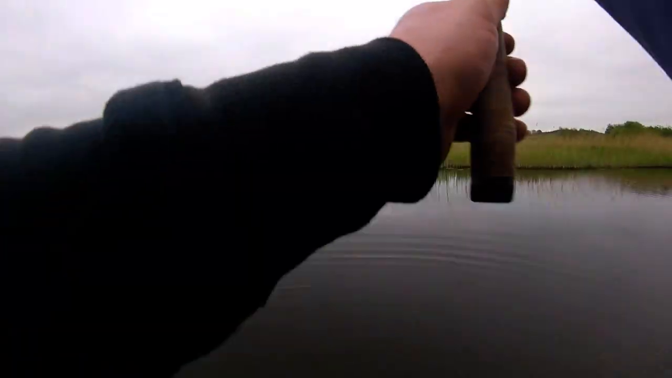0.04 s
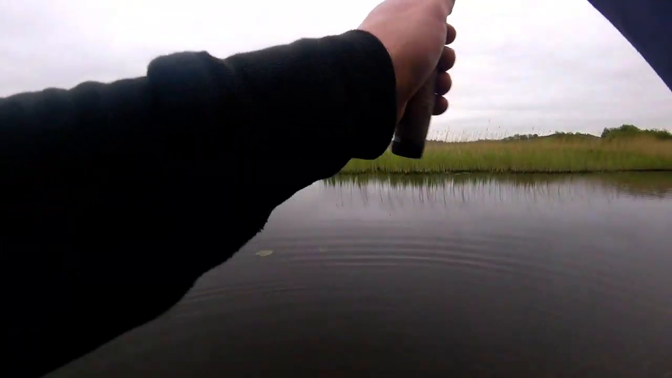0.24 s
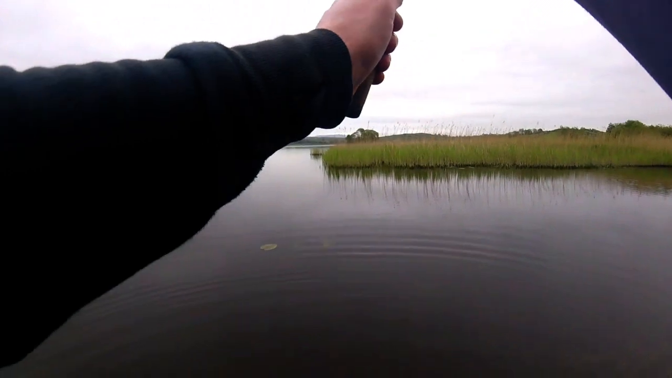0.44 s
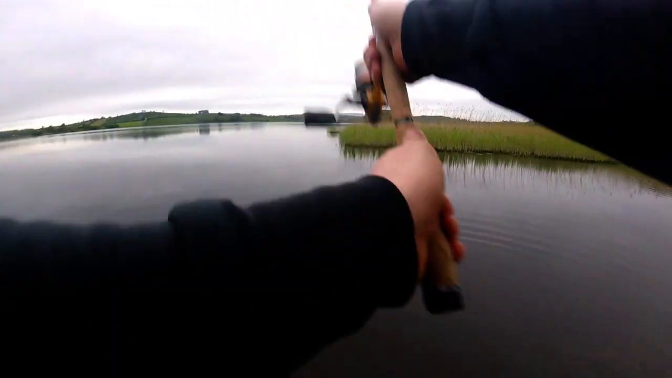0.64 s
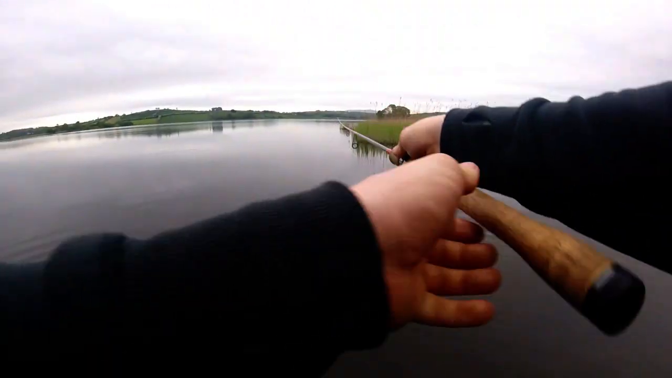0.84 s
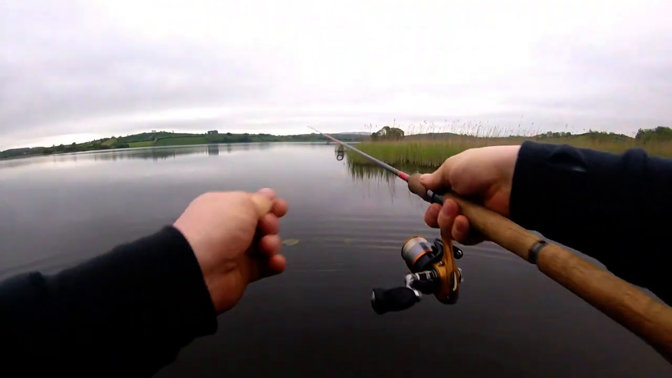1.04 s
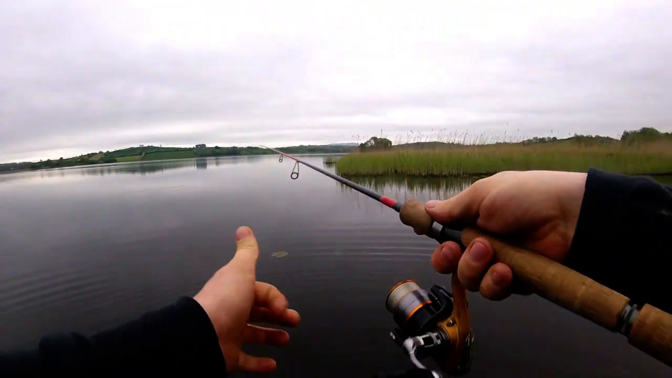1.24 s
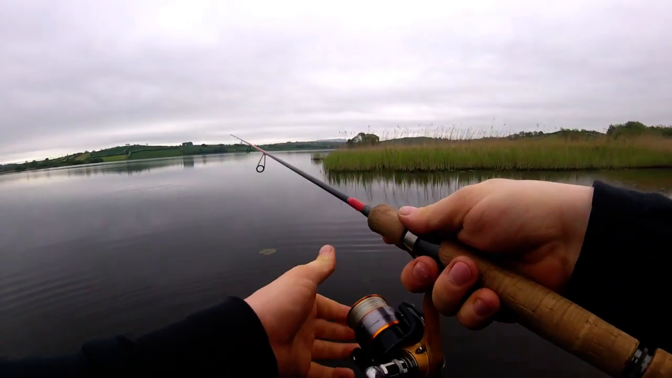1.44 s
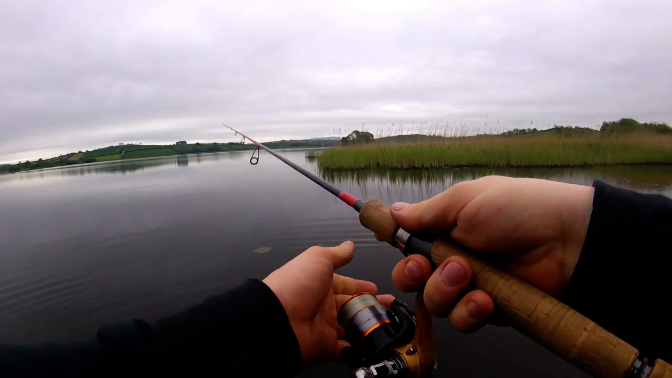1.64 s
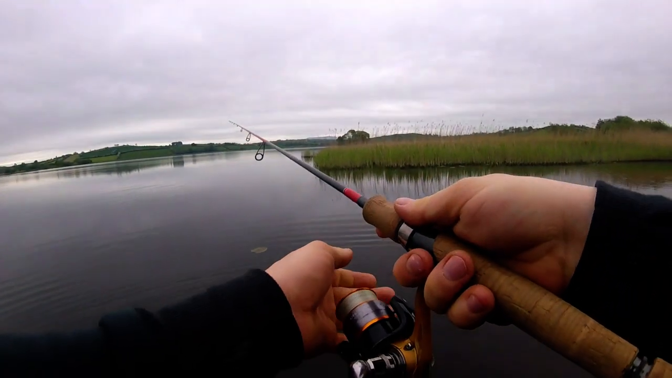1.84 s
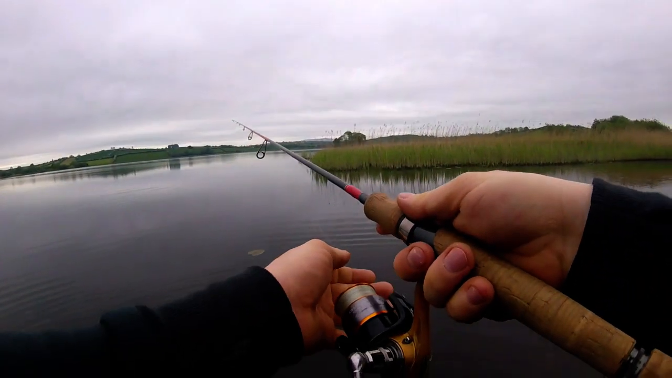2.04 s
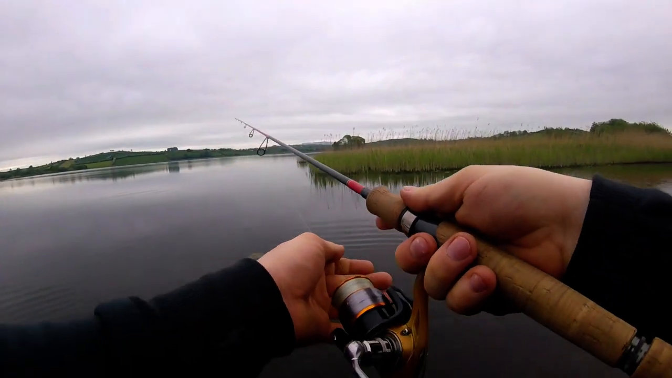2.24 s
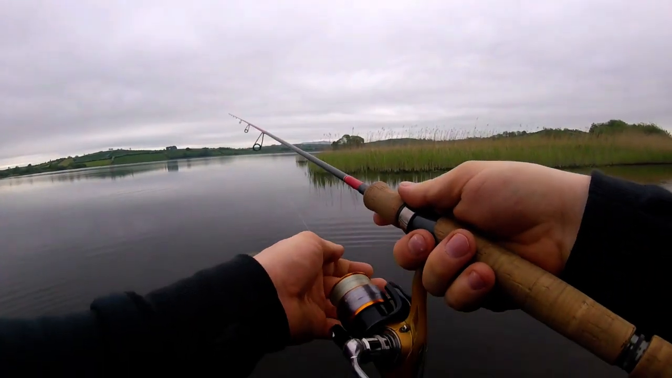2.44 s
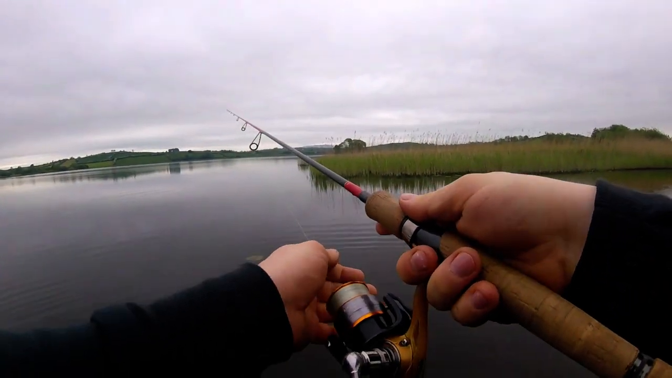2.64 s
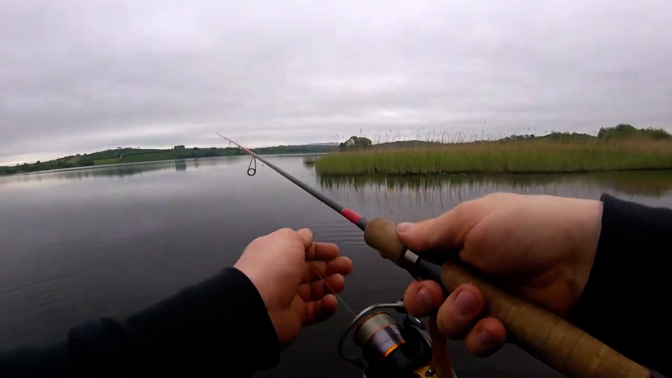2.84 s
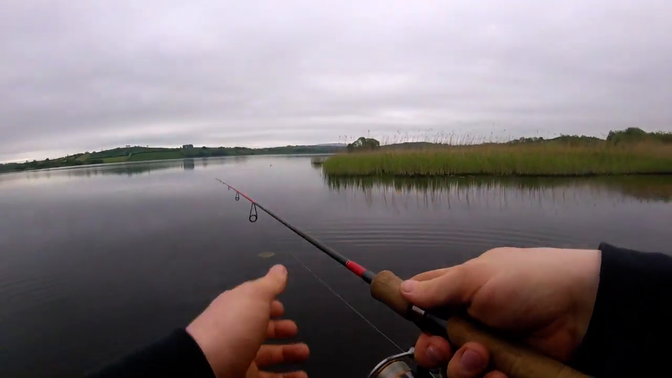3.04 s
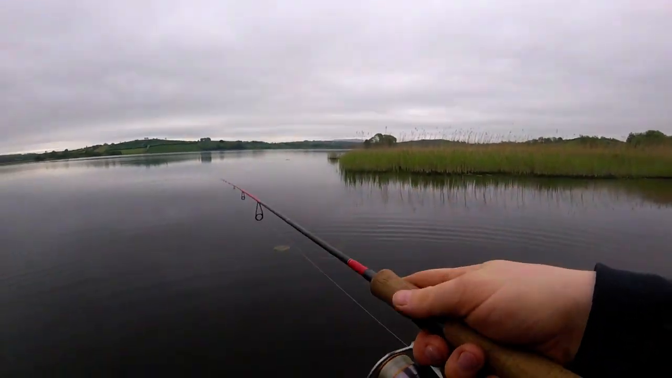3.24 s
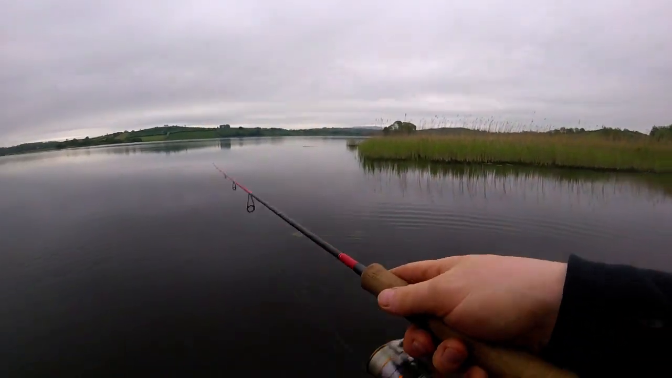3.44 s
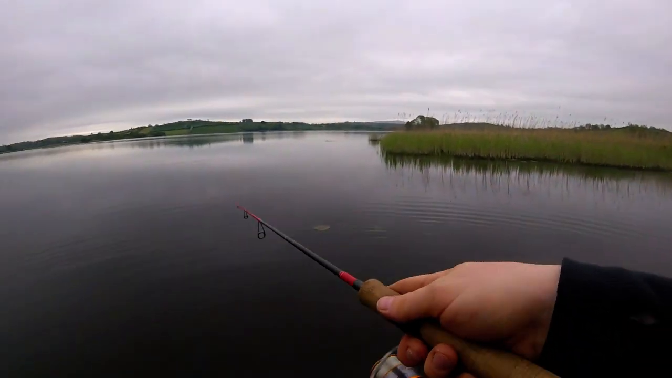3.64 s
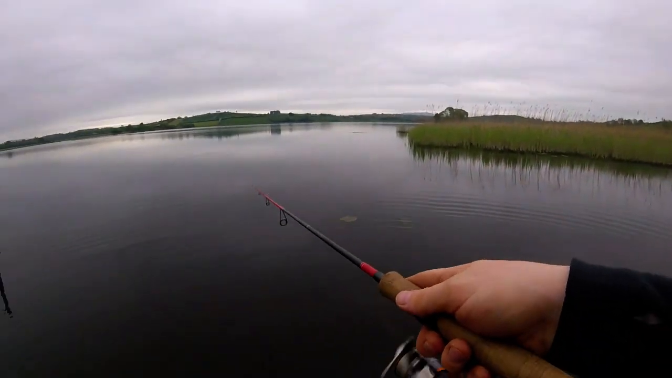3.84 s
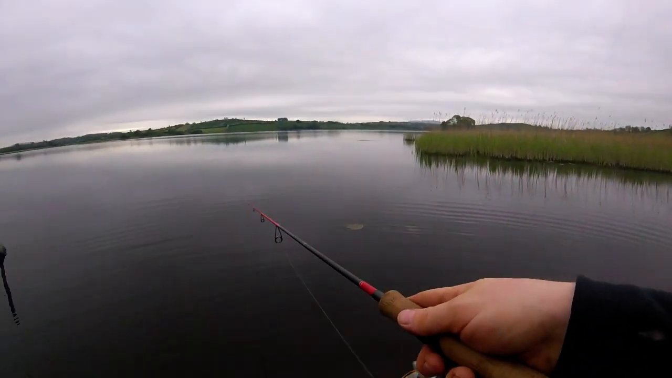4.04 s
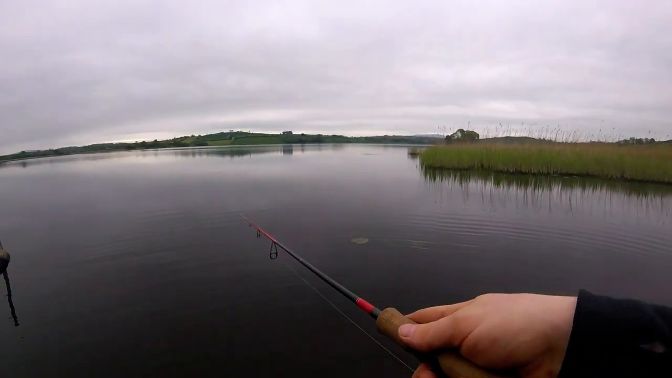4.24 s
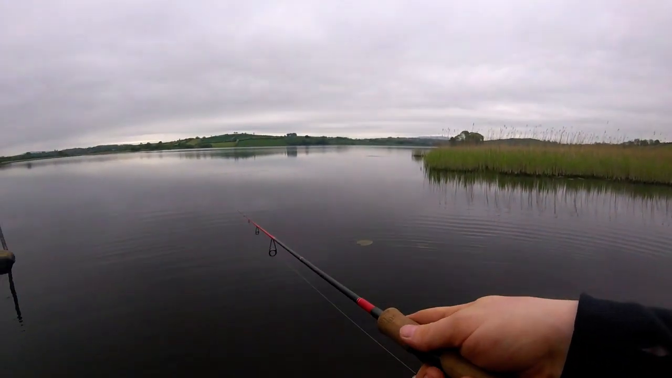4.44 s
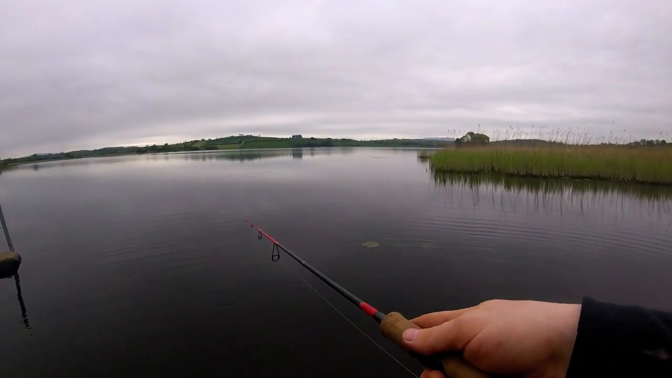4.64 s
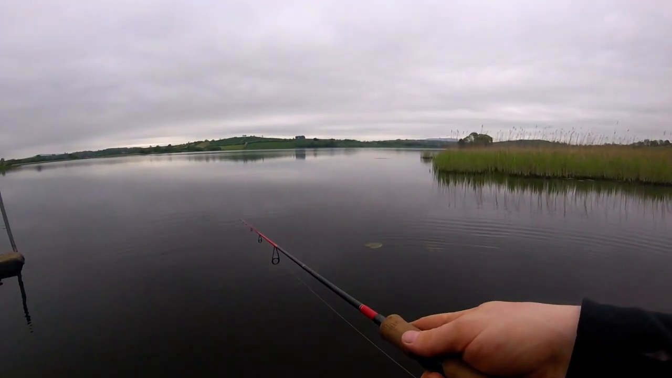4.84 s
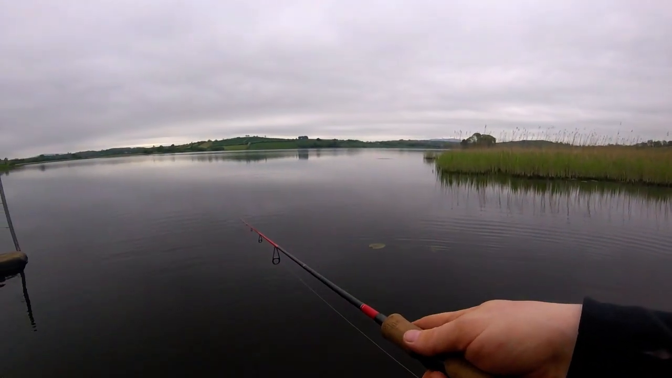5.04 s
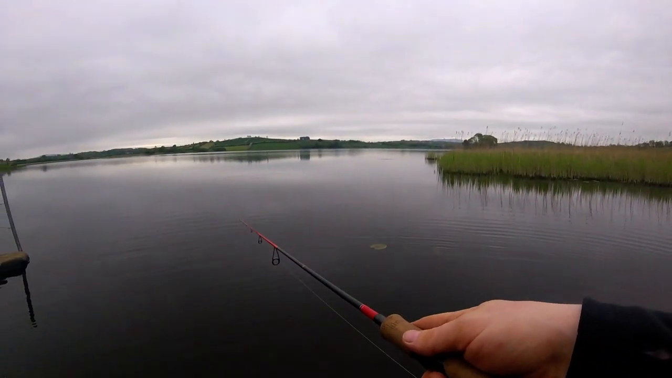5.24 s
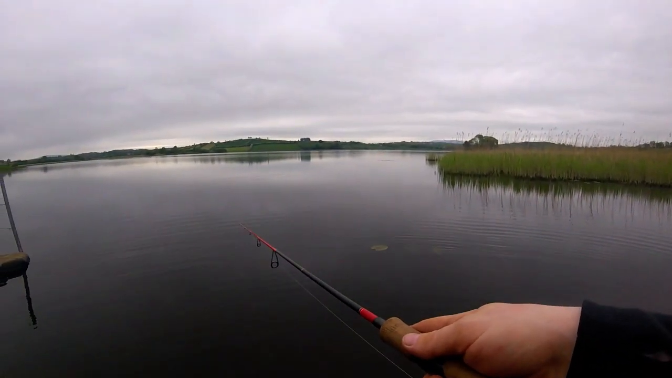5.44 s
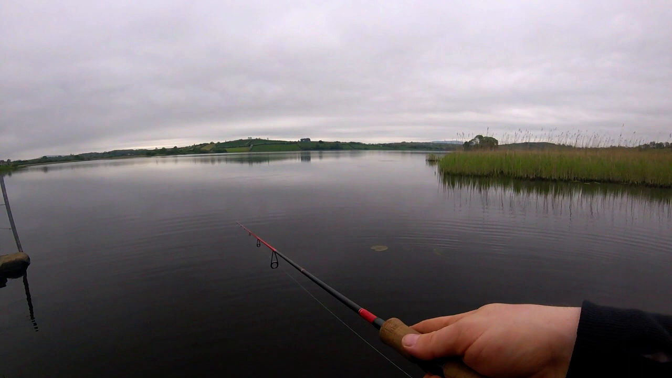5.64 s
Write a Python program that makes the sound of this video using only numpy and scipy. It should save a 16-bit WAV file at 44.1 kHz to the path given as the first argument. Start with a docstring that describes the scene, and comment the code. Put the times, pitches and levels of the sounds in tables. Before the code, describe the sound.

Gusts rumble on a close microphone by a lake, with faint whistles and chirps from two birds. A fishing cast begins with sleeve rustle, two hollow rod knocks and a quick swish. Line zips out, then coasts with a faint singing hiss and small ticks until the reel clacks shut, the loudest sound. Afterward come a brief rustle, soft knocks and more wind and birdsong.

```python
"""An angler casts a spinning rod over a calm lake, close to a chest-worn microphone.
Wind rumbles on the microphone, a far bird whistles and a reed bird chirps, on and off throughout.
Sleeves rustle through the wind-up, the rod knocks twice, and its tip sheds eddies in a swish.
Line zips off the spool, ticks through the rings and sings thinly as it coasts and slows.
Near 2.8 s the bail snaps shut and rings the reel; gusts, light knocks and birdsong follow."""
import sys
import numpy as np
from scipy import signal
from scipy.fft import rfft, irfft
from scipy.io import wavfile
from scipy.ndimage import uniform_filter1d

SR = 44100
rng = np.random.default_rng(int(sys.argv[2]) if len(sys.argv) > 2 else 0)


def to_wav(sig):
    """Store sig (one row per channel, or 1-D mono) as 16-bit WAV at the path in sys.argv[1].

    Samples outside -1..1 are clipped; the rate is SR.
    """
    pcm = np.clip(np.atleast_2d(sig), -1, 1) * 32767
    pcm = np.round(pcm).astype(np.int16)
    wavfile.write(sys.argv[1], SR, pcm.T)  # frames by channels


N = 251370
TIME = np.arange(N) / SR

# gusts on the microphone: (time [s], hold [s], level [dB])
GUSTS = [(0.125, 0.19, -44), (0.74, 0.042, -38.5), (0.984, 0.032, -36.5), (1.15, 0.28, -41),
         (1.461, 0.03, -35), (3.428, 0.011, -38), (3.668, 0.54, -41), (4.256, 0.45, -39), (5.656, .03, -43)]
# wind rumble, its faster buffeting, and open-air hiss: (frequency [Hz], relative level [dB])
RUMBLE_EQ = [(12, -12), (28, -0.5), (55, 0), (95, -7.5), (150, -20.5), (400, -61.5)]
BUFFET_EQ = [(50, -14), (130, 8.0), (210, 2.5), (500, -51.5)]
HISS_EQ = [(100, 5.5), (600, -4), (1200, -8), (2200, -10.5), (4200, -20), (5600, -18.5), (6550, -4.5),
           (7300, -12), (9000, -16.5), (11000, -28)]
# far bird: (time [s], length [s], start pitch [Hz], end pitch [Hz], level [dB], warble depth [Hz])
WHISTLES = [(0, 0.026, 2210, 1970, -62, 93), (0.274, 0.13, 3680, 3970, -73, 0),
            (.39, 0.15, 1820, 1850, -64.5, -7), (.595, 0.037, 2260, 2460, -61.5, 0),
            (0.63, 0.081, 1830, 2450, -57, 0), (0.813, .094, 2665, 2450, -53, 0),
            (4.4, 0.23, 2415, 2550, -70, -2), (4.687, 0.081, 1890, 1810, -67.5, -4),
            (4.849, .07, 1700, 1830, -71, 0), (4.936, 0.046, 2830, 2740, -61, 85),
            (4.958, .16, 2830, 2080, -57.5, 0), (5.097, .1, 2150, 2560, -64.5, 290),
            (5.297, 0.16, 2535, 2320, -63.5, 123), (5.337, 0.3, 2425, 2198, -59, 2)]
# reed bird's syllables: (length [s], start pitch [Hz], middle pitch [Hz], end pitch [Hz])
FALL = (.054, 6400, 4750, 3600)
RISE = (.042, 5050, 5550, 6150)
CLIMB = (.042, 3250, 4400, 5900)
DIP = (.05, 6700, 5850, 6450)
SCOOP = (.055, 5750, 5450, 5700)
DROP = (.032, 4750, 4550, 3300)
SLUR = (.065, 4750, 4350, 4350)
SLIDE = (.08, 5950, 4600, 3100)
FLICK = (.026, 5500, 4400, 4050)
# its phrases: (time [s], level [dB], syllable, repeats, period [s], swell per repeat [dB])
REED_PHRASES = [(.072, -71.5, FALL, 3, .157, 1), (.975, -65, SCOOP, 1, 0, 0),
                (1.462, -65.5, DIP, 3, .182, 1.5), (1.966, -68.5, SLUR, 1, 0, 0),
                (2.062, -70.5, FLICK, 13, .0578, 0), (2.968, -70.5, CLIMB, 1, 0, 0),
                (3.283, -64, SLIDE, 1, 0, 0), (4.239, -69.5, DROP, 1, 0, 0), (4.268, -69.5, CLIMB, 1, 0, 0),
                (4.451, -67, RISE, 3, 0.203, 1.5), (4.507, -73, FALL, 3, .204, 1.8)]
# wind-up, follow-through, letting go of the reel: (peak time [s], level [dB], rise [s], fall [s])
ARM_MOVES = [(.47, -48, 0.58, 0.42), (.8, -50, 0.12, 0.52), (3.17, -50.5, 0.17, 0.13)]
# sleeve rustle: (frequency [Hz], relative level [dB])
CLOTH_EQ = [(80, 1), (200, 6), (450, 3), (850, -2), (1400, -15), (2500, -22.5), (5000, -27), (10000, -36)]
# hollow knocks of rod and grip: (time [s], level [dB], pitch [Hz])
ROD_KNOCKS = [(0.6376, -25, 787), (.7203, -20, 617), (0.741, -34.5, 132), (3.656, -42, 172),
              (4.486, -35.5, 145), (5.484, -44, 344)]
# line and fingers on reel and rings: (time [s], level [dB], brightest frequency [Hz], t60 [s])
TICKS = [(.667, -46.5, 3200, .012), (.7573, -25.5, 5350, 0.0054), (0.818, -39, 5000, .008),
         (0.8702, -35.5, 5200, 0.0086), (1.2526, -41, 5430, 0.0069), (1.511, -42.5, 5660, .0084),
         (2.7121, -41, 4930, 0.023), (3.289, -52, 2350, 0.035), (3.325, -46, 5300, 0.065)]
# rush of the line: (frequency [Hz], relative level [dB])
LINE_EQ = [(400, -23), (1300, 3.5), (2000, -0.5), (2600, 4.5), (3400, 0), (4300, -5), (5600, 6), (7000, -8),
           (11000, -27)]
# the bail trips, strikes its stop, rebounds and settles:
# (time [s], level [dB], first bounce gap [s], loss per bounce [dB])
BAIL_HITS = [(2.7963, -29, 0.0057, 1), (2.811, -12.5, 0.0032, 0.2), (2.8224, -22.5, 0.006, 0.5),
             (2.8431, -36, 0.0055, 19), (2.864, -49.5, 0.01, -0.5)]
# crack of metal on metal: (frequency [Hz], relative level [dB])
CRACK_EQ = [(120, -33), (470, 1), (850, -12.5), (1600, -0.5), (2300, -1.5), (3000, -14), (3600, 0.5),
            (4400, -6.5), (6400, 8), (7800, -7.5), (11000, -14.5)]
# ring of bail wire and spool: (frequency [Hz], relative level [dB])
WIRE_MODES = [(4893, -16), (5115, -5.5), (5265, -11), (5510, -7), (5790, -42), (6075, -31), (6285, -28),
              (6423, -11), (6590, -3), (6895, -20), (7160, -15), (7350, -22)]
# ring of the reel's casing: (frequency [Hz], relative level [dB], t60 [s])
CASING_MODES = [(320, -37, 0.044), (460, -28, 0.35), (490.5, -20.5, 0.15), (1058, -18, 0.08),
                (1607, -14, 0.06), (2280, -15, 0.034)]

RELEASE_S, BAIL_TRIP_S = .739, BAIL_HITS[0][0]  # the line runs between these cues


def gain_of(db):
    """Decibels to amplitude."""
    return 10 ** (np.asarray(db) / 20)


def unit_rms(x):
    """Scales to rms 1."""
    return x / np.sqrt(np.mean(x ** 2) + 1e-20)


def envelope(s, hold_s, db, rise_s, fall_s):
    """Gain that swells until time s, holds, then dies away."""
    before, after = np.maximum(s - TIME, 0), np.maximum(TIME - s - hold_s, 0)
    return gain_of(db) * np.exp(-before / rise_s - after / fall_s)


def add(mix, s, sound):
    """Lays a sound into the mix at time s."""
    part = mix[max(round(s * SR), 0):][:len(sound)]
    part += sound[:len(part)]


def colour(x, eq, size=4096):
    """Minimum-phase EQ that passes white noise at equal power."""
    hz, db = np.transpose(eq)
    bins = abs(np.fft.fftfreq(size, 1 / SR))
    log_gain = np.log(gain_of(np.interp(np.log(bins + 1), np.log(hz), db)))
    taps = np.fft.ifft(np.exp(np.conj(signal.hilbert(log_gain)))).real[:size // 2]
    return signal.fftconvolve(x, taps / np.linalg.norm(taps))[:len(x)]


def drift(rate_hz):
    """Smooth random wander of rms 1."""
    hz = np.fft.rfftfreq(N, 1 / SR)
    return unit_rms(irfft(rfft(rng.standard_normal(N)) * np.exp(-(hz / rate_hz) ** 2), N))


def phase_of(hz):
    """Running phase of a gliding pitch."""
    return 2 * np.pi * np.cumsum(hz) / SR


def burst(t60):
    """Noise that starts near rms 1 and dies away."""
    decay = gain_of(-60 * np.arange(SR // 4) / SR / t60)
    noise = decay * rng.standard_normal(len(decay))
    return noise * np.linalg.norm(decay) / np.linalg.norm(noise)


def reverb(x, t60):
    """Diffuse reflections of about equal power."""
    tail = burst(t60)
    return signal.fftconvolve(x, tail / np.linalg.norm(tail))[:N]


def wind(breeze_db=-47, rise_s=0.035, fall_s=0.028, steadiness=0.43, buffet_db=-15, buffet_growth=1.85):
    """Low turbulence rumbles on the microphone; strong gusts add faster buffeting."""
    eddies = colour(rng.standard_normal(N), RUMBLE_EQ, size=16384)
    power = uniform_filter1d(eddies ** 2, size=4000) + 1e-9
    rumble = unit_rms(eddies / power ** (steadiness / 2))  # gentle compression
    gust = np.sqrt(gain_of(breeze_db) ** 2 + sum(envelope(*row, rise_s, fall_s) ** 2 for row in GUSTS))
    buffet = colour(rng.standard_normal(N), BUFFET_EQ)
    buffet *= gain_of(buffet_db) * gust.max() * (gust / gust.max()) ** buffet_growth
    return gust * rumble + buffet


def air(db=-57.5):
    """A steady bed of air and microphone hiss, with a narrow crest in the treble."""
    return gain_of(db) * colour(rng.standard_normal(N), HISS_EQ)


def bird_note(length, start_hz, middle_hz, end_hz, db, warble_depth_hz=0, warble_hz=85):
    """A near-pure tone bending through three pitches."""
    t = np.arange(int(length * SR)) / SR
    bend = np.polyfit([0, .5, 1], [start_hz, middle_hz, end_hz], 2)
    hz = np.polyval(bend, t / length) + warble_depth_hz * np.sin(2 * np.pi * warble_hz * t)
    swell = np.sqrt(np.sin(np.pi * t / length))
    return gain_of(db) * unit_rms(swell * np.sin(phase_of(hz)))


def far_bird(glide_by_middle=.66):
    """Whistles that glide quickly at first, then ease off; some warble."""
    song = np.zeros(N)
    for s, length, start_hz, end_hz, db, warble in WHISTLES:
        middle_hz = start_hz + glide_by_middle * (end_hz - start_hz)
        add(song, s, bird_note(length, start_hz, middle_hz, end_hz, db, warble))
    return song


def reed_bird(db_per_octave=20, scatter_db=-3, scatter_t60=0.025):
    """Repeated chirps, each tilted louder toward its higher end and blurred by the reeds."""
    song = np.zeros(N)
    for s, db, syllable, repeats, period, swell_db in REED_PHRASES:
        _, start_hz, _, end_hz = syllable
        for k in range(repeats):
            chirp = bird_note(*syllable, db + k * swell_db)
            octaves = np.log2(end_hz / start_hz) * np.linspace(-.5, .5, len(chirp))
            add(song, s + k * period, chirp * gain_of(db_per_octave * octaves))
    return song + gain_of(scatter_db) * reverb(song, scatter_t60)


def birds(waver_db=2.0, echo_db=-15, echo_t60=0.1):
    """Both birds waver with distance, and the shore returns a faint echo."""
    song = (far_bird() + reed_bird()) * gain_of(waver_db * drift(130))
    return song + gain_of(echo_db) * reverb(song, echo_t60)


def sleeves(fidget_db=-67, rough_db=1.45):
    """Soft cloth slides and catches, swelling with each arm move."""
    move_power = sum(envelope(s, 0, *shape) ** 2 for s, *shape in ARM_MOVES)
    motion = np.sqrt(gain_of(fidget_db) ** 2 + move_power)
    friction = rng.standard_normal(N) * gain_of(rough_db * drift(50))
    return motion * unit_rms(colour(friction, CLOTH_EQ))


def rod_knock(db, pitch_hz, ring_cycles=13, sag=0.13, sag_s=0.0052, rise_s=0.0004,
              overtone_ratio=1.69, overtone_db=-12):
    """Rod and grip ring hollow for a few damped cycles, with a sagging pitch and one overtone."""
    t = np.arange(SR // 8) / SR
    phase = phase_of(pitch_hz * (1 + sag * np.exp(-t / sag_s)))
    tone = np.sin(phase) + gain_of(overtone_db) * np.sin(overtone_ratio * phase)
    shape = (1 - np.exp(-(t / rise_s) ** 2)) * gain_of(-60 * t * pitch_hz / ring_cycles)
    return gain_of(db) * shape / shape.max() * tone


def tick(db, hz, t60, body_db=-5, scoop_db=-8, top_db=-13):
    """A light contact: a noise burst with a bright peak and some body far below it."""
    eq = [(hz / 12, -20), (hz / 3, body_db), (hz / 1.55, scoop_db),
          (hz, 0), (hz * 1.46, top_db), (hz * 2, -24)]
    return gain_of(db) * colour(burst(t60), eq)


def rod_swish(peak_s=.746, rise_s=0.017, fall_s=0.075, top_hz=1950, top_db=-42, growth=5, fuzz_hz=280):
    """Eddies shed by the rod make a fuzzy tone whose pitch and level follow the tip's speed."""
    speed = envelope(peak_s, 0, 0, rise_s, fall_s)
    eddies = unit_rms(np.sin(phase_of(top_hz * speed) + 2 * drift(fuzz_hz)))
    return gain_of(top_db) * speed ** growth * eddies


def spool_zip(start_hz=4000, end_hz=5700, climb_s=.05, db=-47, fuzz_hz=250):
    """The first coils zip off the spool with a fuzzy whistle that climbs as they speed up."""
    hz = end_hz + (start_hz - end_hz) * np.exp(-np.maximum(TIME - RELEASE_S, 0) / climb_s)
    tone = unit_rms(np.sin(phase_of(hz) + 2 * drift(fuzz_hz)))
    return envelope(RELEASE_S, 0, db, rise_s=0.0071, fall_s=0.016) * tone


def running_line(slaps_per_s=600, slap_share=0.8, rush_db=-45.5, sag_db_per_s=77,
                 coast_db=-65, slowing_db_per_s=2, sing_s=1.59, sing_hz=4770, sing_db=-68):
    """Coils slap the spool lip and hiss through the rings: a short rush, then a singing coast."""
    slaps = unit_rms(rng.choice([-1, 1], N) * (rng.random(N) < slaps_per_s / SR))
    hiss = rng.standard_normal(N)
    texture = colour(np.sqrt(slap_share) * slaps + np.sqrt(1 - slap_share) * hiss, LINE_EQ)
    flight_s = np.maximum(TIME - RELEASE_S, 0)
    running = (TIME > RELEASE_S) & (TIME < BAIL_TRIP_S)
    sagging_db = rush_db - sag_db_per_s * flight_s
    rush = envelope(RELEASE_S, hold_s=0.088, db=sagging_db, rise_s=0.016, fall_s=0.0062)
    coast = running * gain_of(coast_db - slowing_db_per_s * flight_s)
    thin_tone = unit_rms(np.sin(phase_of(sing_hz + 25 * drift(200))))
    sing = running * envelope(sing_s, 0, sing_db + 2 * drift(36), rise_s=.4, fall_s=.05)
    return (rush + coast) * texture + sing * thin_tone


def ring_taps(span_s=1.3, db=-54, spread_db=3.5, hz=5500, t60=0.02, count=14):
    """The flying line taps the rod rings at random while it is still fast."""
    out = np.zeros(N)
    for when, strength in rng.random((count, 2)):
        add(out, RELEASE_S + span_s * when, tick(db + spread_db * (2 * strength - 1), hz, t60))
    return out


def bail_snap(wire_db=-6, wire_t60=0.024, casing_db=-8.5, hardness=0.17, crack_t60=0.012,
              rattle_db=-17, rattle_t60=0.061, bounces=3, gap_ratio=.63):
    """Each blow cracks, rattles the gears and rings the wire; hard blows bring out the casing."""
    t, out = np.arange(SR // 4) / SR, np.zeros(N)

    def mode(hz, db, t60):
        """One dying resonance."""
        return gain_of(db - 60 * t / t60) * np.sin(2 * np.pi * hz * t)

    wire = gain_of(wire_db) * sum(mode(hz, db, wire_t60) for hz, db in WIRE_MODES)
    casing = sum(mode(*row) for row in CASING_MODES)
    blows = [(s + gap * sum(gap_ratio ** np.arange(k)), db - k * loss)  # bounces come ever closer
             for s, db, gap, loss in BAIL_HITS for k in range(bounces)]
    hardest_db = max(db for s, db in blows)
    for s, db in blows:
        casing_gain = gain_of(casing_db + hardness * (db - hardest_db))
        contact = colour(burst(crack_t60) + gain_of(rattle_db) * burst(rattle_t60), CRACK_EQ)
        add(out, s, gain_of(db) * (contact + wire + casing_gain * casing))
    return out


def scene():
    """All layers meet at one microphone: a mono mix in both ears."""
    mix = wind() + air() + birds() + sleeves()
    for s, *shape in ROD_KNOCKS:
        add(mix, s, rod_knock(*shape))
    for s, *shape in TICKS:
        add(mix, s, tick(*shape))
    mix += rod_swish() + spool_zip() + running_line() + ring_taps() + bail_snap()
    return np.array([mix, mix])


def record(dry, cutoff_hz=11200):
    """A steep low-pass takes off the top end."""
    taps = signal.firwin(511, cutoff_hz, window=("kaiser", 8), fs=SR)
    return signal.oaconvolve(dry, taps[None], "same")


dry = scene()
out = record(dry)
to_wav(out)
```